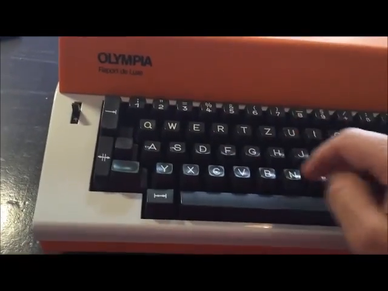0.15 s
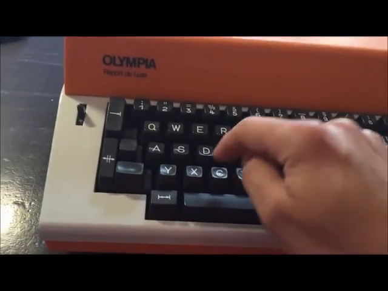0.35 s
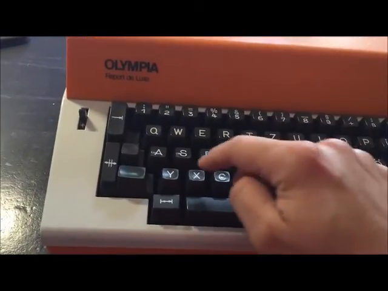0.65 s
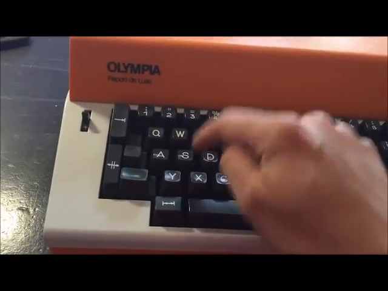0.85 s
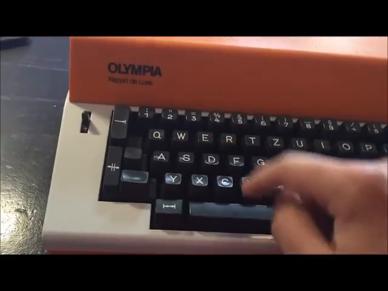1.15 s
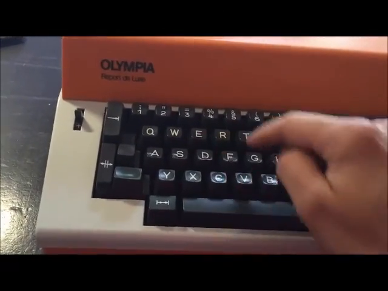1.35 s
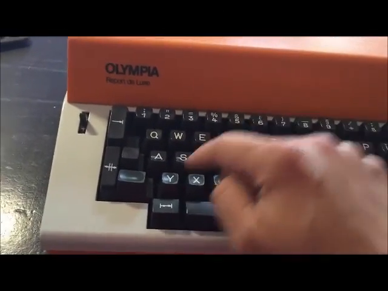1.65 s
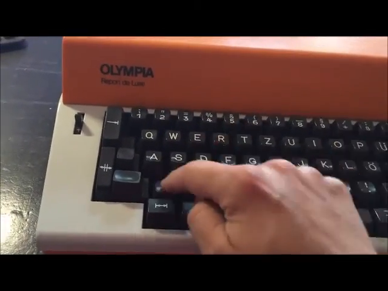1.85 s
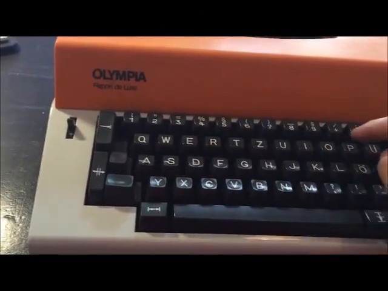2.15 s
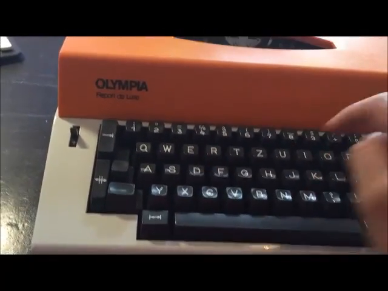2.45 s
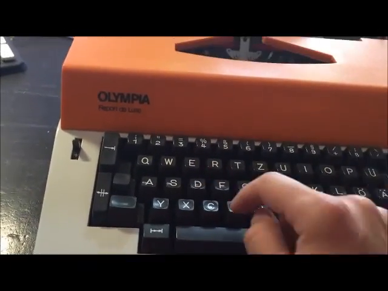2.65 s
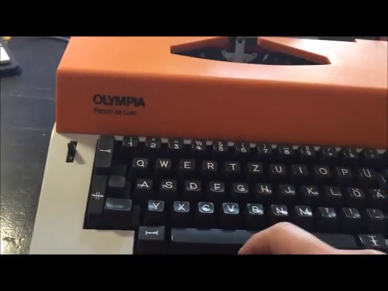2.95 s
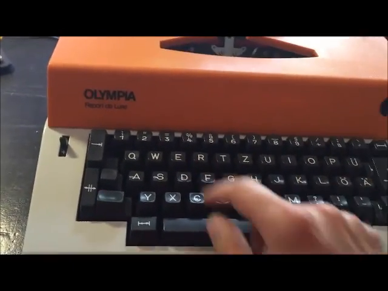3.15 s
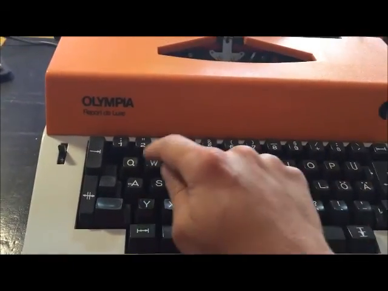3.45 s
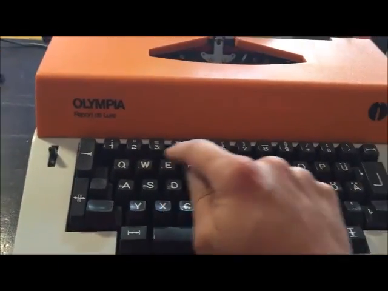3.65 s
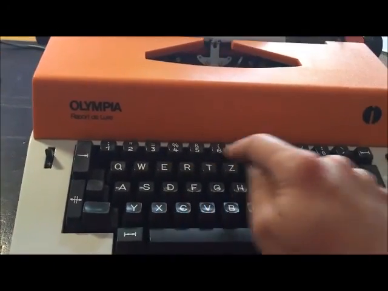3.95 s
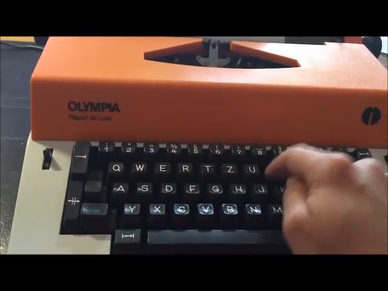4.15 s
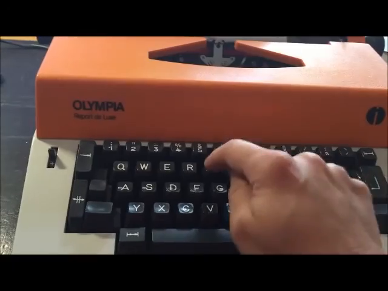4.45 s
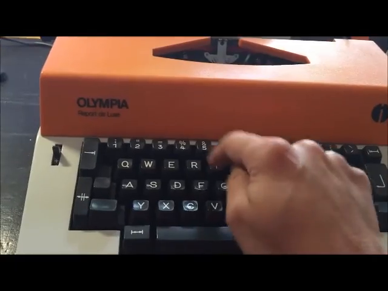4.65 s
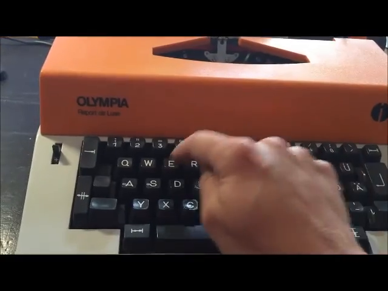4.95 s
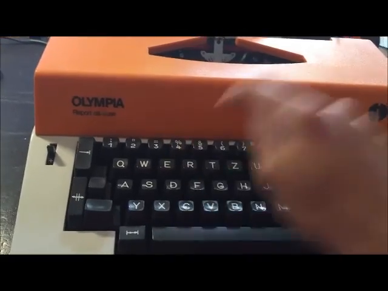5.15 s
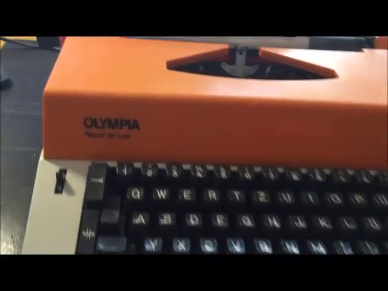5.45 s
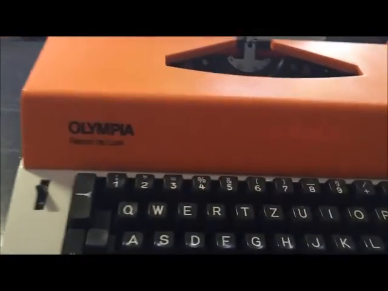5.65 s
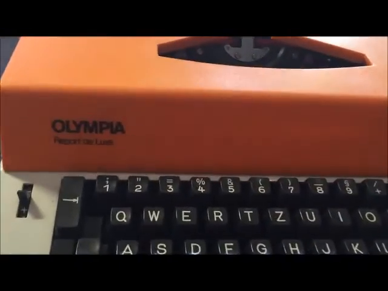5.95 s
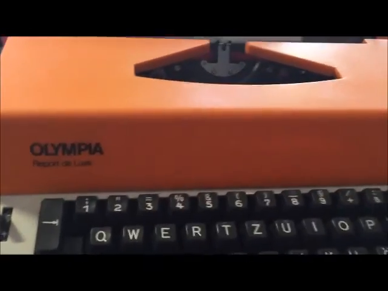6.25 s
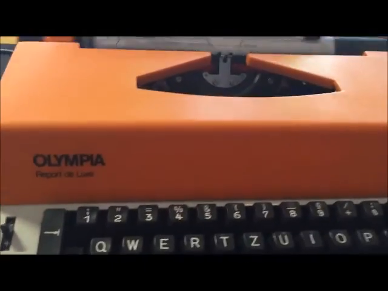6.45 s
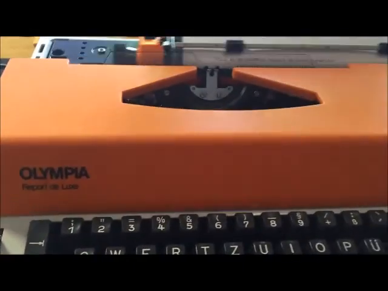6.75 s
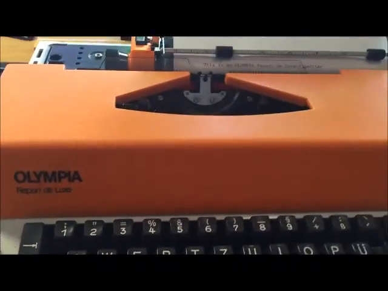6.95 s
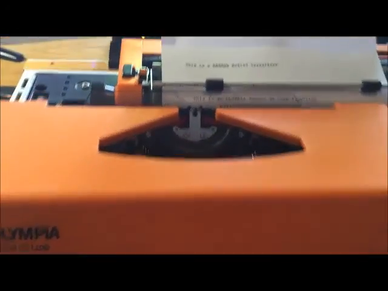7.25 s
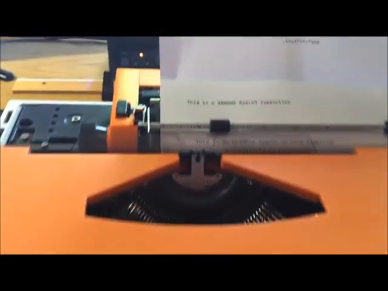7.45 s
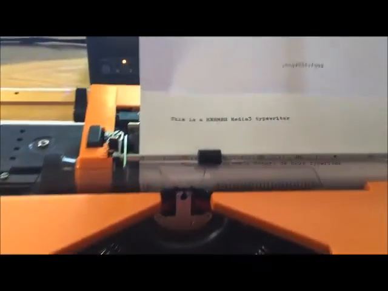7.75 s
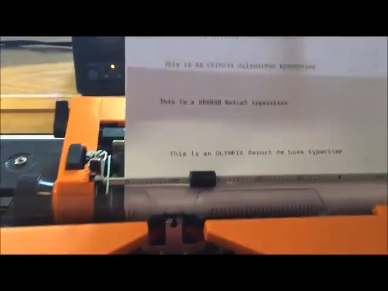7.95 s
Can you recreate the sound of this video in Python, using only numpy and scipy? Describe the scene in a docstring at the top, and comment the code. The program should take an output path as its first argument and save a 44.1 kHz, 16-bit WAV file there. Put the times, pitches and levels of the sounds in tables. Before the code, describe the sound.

Steady low motor whirr under crisp, loud typebar slaps, each preceded by a tiny latch click and followed by a clattering fall-back and faint singing spring. Twelve uneven letters and one softer space, then mostly hum and slight handling. A clunky carriage return follows, with line-feed clicks, gear whirr and hard end-stop bangs. Desk thumps lead to a grinding ratchet at the end. Close, dry sound with short small-room reflections.

```python
"""A small quiet room, a hand-held microphone close to an electric typewriter on a desk; its motor hums throughout.
First one finger types: latch, chattering linkage, typebar on the platen, fall-back, carriage step, a singing spring.
A space falls among the early letters. After the last one a hand scuffs the case and ticks loose levers.
Then the clutch runs the carriage back to its stop with a line feed; at the end the platen is wound over its ratchet.
Contacts are decaying noise bursts, ringing parts are decaying cosines, and the motor is filtered noise and tones."""
import sys
import numpy as np
from scipy import signal
from scipy.fft import rfft, irfft
from scipy.io import wavfile

SR = 44100
rng = np.random.default_rng(int(sys.argv[2]) if len(sys.argv) > 2 else 0)


def wrap_up_sound(samples):
    """Save the sound to the file named by the first command line argument, as 16-bit audio."""
    columns = np.atleast_2d(samples).T
    # keep every value between -1 and 1, then stretch to whole-number steps
    tamed = np.clip(columns, -1, 1)
    steps = np.round(tamed * 32767).astype(np.int16)
    wavfile.write(sys.argv[1], SR, steps)


N = 356945
TIME = np.arange(N) / SR

# Levels in the tables are relative: each source sets its own distance from the microphone.
# decay of the small room: pitch_hz, t60_s
ROOM_DECAY = [(100, 0.18), (500, 0.37), (1600, 0.5), (2500, 0.44), (6000, 0.41), (10000, 0.26),
              (15000, 0.22)]
# spectrum of motor, belt and power roll: pitch_hz, level_db (per Hz)
MOTOR_COLOUR = [(15, -54.5), (25, -18), (69, -12.5), (101, -3.5), (163, -10.5), (293, -11.5), (344, -16),
                (488, -11.5), (529, -20.5), (621, -17.5), (1120, -15.5), (1240, -17.5), (2560, -25),
                (3730, -30.5), (15000, -38.5)]
# steady tones of the motor: pitch_hz, level_db (rms)
MOTOR_HUM = [(96.9, -69.5), (253.0, -72.5), (285.3, -70), (312.2, -69.5), (419.9, -85), (672.9, -86),
             (899.0, -83), (1448, -82.5)]
# soft scuffs of a hand on the case: start_s, level_db, t60_s
HAND_SCUFFS = [(5.642, -51.5, 0.3), (5.982, -51.5, .53), (6.035, -48, 0.71), (7.244, -56.5, 0.63)]
# faint ticks of loose levers: start_s, level_db
LEVER_TICKS = [(6.075, -48.5), (6.136, -46.5), (6.242, -51), (7.328, -44.5)]
# light ping of a lever: start_s, pitch_hz, level_db, t60_s
LEVER_PING = [(5.587, 7450, -55, .12)]
# spectrum of a hand on the case: pitch_hz, level_db (per Hz)
HAND_COLOUR = [(80, 5), (500, -9.5), (1000, -1), (1600, -7), (2300, 0), (3200, -27), (12000, -35)]
# thumps that reach the case and the desk: start_s, level_db, t60_s
DESK_THUMPS = [(1.408, -34.5, 0.24), (2.672, -42, 0.12), (6.409, -38, 0.87), (6.81, -42, 0.3),
               (6.889, -35, 0.42), (7.25, -46, 0.45), (7.331, -37, .25), (7.827, -42, 1)]
# spectrum of the rocking desk: pitch_hz, level_db (per Hz)
DESK_COLOUR = [(30, -36.5), (50, -6.5), (72, 1.5), (95, -2.5), (125, -5), (180, -16.5), (300, -8),
               (600, -26.5), (2000, -64.5)]
# spectrum of a bump in the case: pitch_hz, level_db (per Hz)
CASE_COLOUR = [(80, -17), (190, -11.5), (280, 0), (400, 2), (700, -12), (2000, -22.5), (8000, -51.5)]
# blows of the carriage return, from key and clutch to end stop: start_s, level_db, t60_s, steel_share (0-1)
RETURN_BLOWS = [(6.3412, -21.5, 0.085, 0.66), (6.457, -20.5, 0.068, 0.1), (6.526, -21.5, 0.11, 0.6),
                (6.557, -14, 0.034, 0.13), (6.580, -21, 0.025, 0.1), (6.8155, -10, .036, .66),
                (6.8725, -13, 0.052, 0.1)]
# loudness of the carriage run: start_s, level_db
RUN_LEVEL = [(6.36, -56.5), (6.44, -9), (6.55, -3.5), (6.7, -2.5), (6.8, 0.5), (6.85, -65)]
# spectrum of the carriage rolling on its rail: pitch_hz, level_db (per Hz)
RUN_COLOUR = [(35, -52.5), (60, -14), (209, -20.5), (302, -10.5), (551, -18), (762, -5.5), (835, -17),
              (1490, -9), (1920, -12.5), (2360, -8), (3270, -25.5), (6380, -27.5), (15000, -45)]
# whine of the carriage gears: pitch_hz, level_db (rms)
GEAR_WHINE = [(303, -54), (774, -42.5), (1456, -45.5), (1548, -45)]
# spectrum of the carriage body: pitch_hz, level_db (per Hz)
CARRIAGE_COLOUR = [(60, -25), (300, -4), (600, -0.5), (1000, -0.5), (1600, 4.5), (2500, 4), (3300, -4.5),
                   (4200, -4), (6000, -1.5), (9000, -16), (15300, -11)]
# dull clunks of the carriage landing: start_s, level_db, t60_s
LANDINGS = [(1.403, -29.5, 0.15), (6.7997, -18, 0.058), (6.812, -18, 0.058), (7.330, -32.5, 0.09)]
# spectrum of a carriage landing: pitch_hz, level_db (per Hz)
LANDING_COLOUR = [(120, -21.5), (400, -5), (600, -1), (780, -10), (1000, 3.5), (1300, -3), (1800, -3),
                  (2400, -6), (3200, -16.5), (12000, -32)]
# platen ratchet teeth, at the line feed and while winding: start_s, level_db
RATCHET_TEETH = [(6.4038, -14), (6.424, -12), (7.821, -10), (7.831, -11.5), (7.846, -12.5), (7.875, -11.5),
                 (7.905, -11), (7.922, -14.5), (7.940, -17), (7.954, -19.5), (7.9722, -26), (7.991, -22),
                 (8.0119, -17), (8.029, -14), (8.051, -13), (8.071, -12)]
# spectrum of the pawl scraping over a tooth: pitch_hz, level_db (per Hz)
PAWL_COLOUR = [(100, -25), (270, -6), (480, -11), (900, -9.5), (1600, -14.5), (2200, 2), (2900, -0.5),
               (3500, -5), (4700, -23), (5700, -10), (7200, -15), (9000, -20), (12000, -21), (15300, -30)]
# ring of the pawl: pitch_hz, level_db, t60_s
PAWL_RING = [(2270, -7.5, 0.031), (2880, 0, 0.014), (3010, -8, 0.021), (5250, -22, .008)]
# typed letters: blow_s, blow_db, latch_db, back_s (fall-back, after the blow), back_db, desk_db, spring_db
LETTER_STROKES = [(-.036, -3, -14, .023, -12, -38.5, -50), (0.9045, -2, -20, 0.024, -18, -36.5, -47),
                  (1.0851, -2.5, -13.5, 0.025, -16.5, -41, -40), (1.6381, -2.5, -13, .022, -16, -47, -48.5),
                  (1.988, -3, -18.5, .02, -15.5, -42, -43), (2.4501, -1, -11, .019, -12.5, -37, -42),
                  (3.6427, -1.5, -13.5, .03, -18, -36.5, -47.5),
                  (3.9423, -2.5, -13.5, .0225, -17, -37.5, -45), (4.3092, -3, -13, .023, -14.5, -38.5, -39),
                  (4.728, -3.5, -13.5, .022, -16, -41.5, -48), (5.0248, -1, -14.5, .022, -17, -35.5, -49.5),
                  (5.1674, -4.5, -13.5, .025, -14, -36, -42.5)]
# key trip, cam lift, link pull and escapement of every letter: delay_s (from the blow), level_db, t60_s,
# steel_share (0-1)
STROKE_CONTACTS = [(-.056, -35.5, .03, 0.87), (-.0255, -19, 0.044, 0.8), (-.0135, -22.5, .03, 0.5),
                   (.0346, -20.5, 0.14, 0.5)]
# spectrum of bright steel levers: pitch_hz, level_db (per Hz)
STEEL_COLOUR = [(200, -30), (900, -24.5), (1800, -13.5), (2700, -2), (3700, -8), (4650, -20), (5400, -4.5),
                (7000, -2), (8000, -4), (9100, 0), (10400, -7), (12300, -4), (13500, -6.5), (15000, -12)]
# spectrum of the frame behind the levers: pitch_hz, level_db (per Hz)
FRAME_COLOUR = [(60, -17), (250, -6), (600, -5.5), (1050, 0), (1600, 0), (2250, 3.5), (3000, -2.5),
                (3600, -4), (4800, -8), (6200, -7.5), (8200, -12.5), (9500, -11), (10400, -15),
                (15000, -17.5)]
# steel parts that ring after any contact: pitch_hz, level_db, t60_s
STEEL_RING = [(2050, -9, .13), (3020, -6, .08), (5500, -10, .07), (7340, -9.5, .15), (7900, -7, .18),
              (9470, 6.5, .07), (11080, 5, .08), (12400, 0, 0.17), (15000, 2.5, .12)]
# one typebar on the platen: pitch_hz, level_db, t60_s
PLATEN_RING = [(1350, -16.5, 0.022), (2129, -1, .015), (2350, 0, .014), (2940, -10.5, 0.024),
               (4247, -18.5, 0.025), (5443, -6.5, .014), (6100, 1, 0.012), (6550, 1.5, 0.011),
               (7080, -8.5, 0.019), (11200, -11, .005), (12500, -13, 0.0055)]

LATCH_S = -.047  # the latch throws the cam onto the power roll, before the blow
SPACE_S, SPACE_DB = 1.3205, -23.5  # the space bar fires
REBOUND_S, REBOUND_LOSS_DB = .0187, 1.3  # its lever rebounds, weaker each time
STEP_S, STEP_DB = .082, -23  # then the carriage comes to rest one step on
FEED_S, FEED_PEAK_S, FEED_END_S = 6.372, 6.408, 6.555  # the line feed rattles up, is at its hardest, has settled
STOP_S, STOP_RATTLE_S = 6.812, .092  # the carriage shudders against the end stop
WINDING_S, PAPER_RISE_S = 7.821, .022  # the paper noise is full at WINDING_S, after this rise
TOOTH_T60_S, TOOTH_DB, DRAG_DB = 0.024, -6, 11  # a tooth DRAG_DB weaker than TOOTH_DB scrapes e times longer
SPRING_HZ, SPRING_T60_S, SPRING_SWELL_S = 420.4, 1.82, 0.056
OVERTONE_HZ, OVERTONE_DB, OVERTONE_T60_S = 3806, -17, .6  # a high wire mode of the same spring
TOP_HZ = 15300  # upper limit of the microphone chain


def undb(db):
    """Decibels to gain."""
    return 10 ** (np.asarray(db) / 20)


def fade(t, t60):
    """Exponential decay that loses 60 dB in t60 seconds."""
    return np.exp(-np.log(1000) * t / t60)


def add(track, start_s, sound):
    """Mix a sound into a track, cutting whatever falls outside."""
    start = int(round(start_s * SR))
    lo, hi = max(start, 0), min(start + len(sound), len(track))
    if hi > lo:
        track[lo:hi] += sound[lo - start:hi - start]


def through(x, response):
    """Pass a sound through an impulse response."""
    return signal.fftconvolve(x, response)[:N]


def colour(x, points, size=4096):
    """Minimum-phase filter with the given spectrum; white noise keeps its level."""
    hz, db = np.transpose(points)
    bins = np.maximum(np.fft.rfftfreq(size, 1 / SR), 1)
    spectrum = undb(np.interp(np.log(bins), np.log(hz), db))
    cepstrum = irfft(np.log(spectrum))
    # fold the cepstrum forward in time, so nothing sounds before its cause
    cepstrum[1:size // 2] *= 2
    cepstrum[size // 2 + 1:] = 0
    response = irfft(np.exp(rfft(cepstrum)))
    return through(x, response / np.linalg.norm(response))


def walk(rate):
    """Random drift with a spread near 1, through `rate` new values a second."""
    knots = rng.standard_normal(int(N / SR * rate) + 2)
    return np.interp(TIME * rate, np.arange(len(knots)), knots)


def burst(db, t60, snap=0., rise_s=.0005, rattle_db=3, rattle_rate=450):
    """One contact: parts meet over a moment, snap home (share of the energy) and rattle unevenly to rest."""
    lead = max(int(rise_s * SR), 1)
    rise = np.linspace(0, 1, lead) ** 2
    decay = fade(np.arange(int(t60 * SR) + 2) / SR, t60)
    envelope = np.concatenate([rise, decay])
    bounces = rng.standard_normal(1024)
    bounce_at = np.arange(len(envelope)) / SR * rattle_rate
    rattle = undb(rattle_db * np.interp(bounce_at, np.arange(len(bounces)), bounces))
    chatter = rng.standard_normal(len(envelope)) * envelope * rattle
    snap = np.clip(snap, 0, 1)
    chatter *= np.sqrt(1 - snap) / np.linalg.norm(chatter)
    chatter[lead] += np.sqrt(snap)
    return undb(db) * np.linalg.norm(envelope) * chatter


def ring(modes, length_s, detune=0.):
    """A struck part as a sum of decaying modes, each randomly detuned by a small fraction."""
    t = np.arange(int(length_s * SR)) / SR
    total = np.zeros(len(t))
    for hz, db, t60 in modes:
        tuned_hz = hz * (1 + detune * rng.standard_normal())
        total += undb(db) * fade(t, t60) * np.cos(2 * np.pi * tuned_hz * t)
    return total


def tones(lines, waver, rate):
    """Lines of a rotating drive, each wavering a little in speed."""
    total = np.zeros(N)
    for hz, db in lines:
        turns = np.cumsum(1 + waver * walk(rate)) / SR
        total += np.sqrt(2) * undb(db) * np.sin(2 * np.pi * hz * turns)
    return total


def contacts(rows, body, snap, rise_s=.0018):
    """Each contact sounds partly in small steel levers and partly in the heavier body behind them."""
    bright, dull = np.zeros(N), np.zeros(N)
    for s, db, t60, share in rows:
        share = np.clip(share, 0, 1)
        add(bright, s - rise_s, np.sqrt(share) * burst(db, t60, snap, rise_s))
        add(dull, s - rise_s, np.sqrt(1 - share) * burst(db, t60, snap, rise_s))
    return colour(bright, STEEL_COLOUR) + colour(dull, body)


def clatter(start_s, end_s, first_db, last_db, t60, share, count, scatter_db=2.0):
    """Loose parts tap at uneven moments, growing or dying away; `share` is the mean share of bright steel."""
    chance = rng.random((count, 3))
    along = (np.arange(count) + chance[:, 0]) / count
    times = start_s + (end_s - start_s) * along
    levels = first_db + (last_db - first_db) * along + scatter_db * (2 * chance[:, 1] - 1)
    shares = share * 2 * chance[:, 2]
    return [(s, db, t60, part) for s, db, part in zip(times, levels, shares)]


def reflections(x, build_s=0.002, count=24):
    """Diffuse reflections at one spot: noise in `count` bands that builds quickly, each band with its own decay."""
    t = TIME[:SR // 2]
    noise, bins = rfft(rng.standard_normal(len(t))), np.fft.rfftfreq(len(t), 1 / SR)
    edges = np.geomspace(40, SR / 2, count + 1)
    tail = np.zeros(len(t))
    for lo, hi in zip(edges, edges[1:]):
        t60 = np.interp(np.sqrt(lo * hi), *np.transpose(ROOM_DECAY))
        band = irfft(noise * ((bins >= lo) & (bins < hi)), len(t))
        tail += band * fade(t, t60)
    tail *= np.minimum(t / build_s, 1)
    return through(x, tail / np.linalg.norm(tail))


def room(x, wet_db=-11, count=6):
    """The hand-held microphone drifts from spot to spot, so the pattern of reflections keeps changing."""
    place = np.linspace(0, count - 1, N)
    echo = np.zeros(N)
    for spot in range(count):
        nearness = np.maximum(1 - np.abs(place - spot), 0)
        echo += np.sqrt(nearness) * reflections(x)
    return undb(wet_db) * echo


def motor(noise_db=-61):
    """The idling motor, belt and power roll: an uneven whirr of noise under steady, slightly wavering hum."""
    level = undb(noise_db + 1.2 * walk(31))
    whirr = level * colour(rng.standard_normal(N), MOTOR_COLOUR)
    return whirr + tones(MOTOR_HUM, waver=0.0044, rate=6.7)


def handling(tick_t60=0.13, tick_share=0.26, brush_s=0.03):
    """A hand brushes the case unevenly and nudges loose levers, one of which pings."""
    rub, ping = np.zeros(N), np.zeros(N)
    for s, db, t60 in HAND_SCUFFS:
        add(rub, s - brush_s / 2, burst(db, t60, rise_s=brush_s, rattle_rate=90))
    ticks = [(s, db, tick_t60, tick_share) for s, db in LEVER_TICKS]
    for s, *mode in LEVER_PING:
        add(ping, s, ring([mode], .2))
    return colour(rub, HAND_COLOUR) + contacts(ticks, CARRIAGE_COLOUR, snap=0.) + ping


def desk(swing_db=-2, swing_s=-.019, landing_s=.04, case_db=-34, case_s=.054, bump_db=-6):
    """Typebar swings and a leaning hand rock the desk; each carriage step lands with a dull bump in the case."""
    push, bump = np.zeros(N), np.zeros(N)
    for s, *_, db, _ in LETTER_STROKES:
        add(push, s + swing_s, burst(db + swing_db, 0.2, rise_s=0.0035))
        add(push, s + landing_s, burst(db, .36, rise_s=0.0073))
        add(bump, s + case_s, burst(case_db, .11, rise_s=0.0068))
    for s, db, t60 in DESK_THUMPS:
        add(push, s, burst(db, t60))
        add(bump, s, burst(db + bump_db, .12))
    for s, db, t60 in HAND_SCUFFS:
        add(push, s, burst(db, t60, rise_s=0.013))
    return colour(push, DESK_COLOUR) + colour(bump, CASE_COLOUR)


def carriage(rumble_db=-38.5, whine_db=-2):
    """The clutch pulls the carriage along its rail with rough, whining gears, until it hits the stop."""
    run = undb(np.interp(TIME, *np.transpose(RUN_LEVEL)))
    rolling = undb(rumble_db + 2 * walk(90)) * colour(rng.standard_normal(N), RUN_COLOUR)
    whine = tones(GEAR_WHINE, waver=.007, rate=100) * undb(whine_db + 3.5 * walk(90))
    landings = np.zeros(N)
    for s, db, t60 in LANDINGS:
        add(landings, s, burst(db, t60))
    rows = list(RETURN_BLOWS)
    rows += clatter(FEED_S, FEED_PEAK_S, first_db=-31, last_db=-25, t60=0.1, share=0.068, count=4)
    rows += clatter(FEED_PEAK_S, FEED_END_S, first_db=-22.5, last_db=-30, t60=0.086, share=.22, count=11)
    rows += clatter(STOP_S, STOP_S + STOP_RATTLE_S, first_db=-26.5, last_db=-32, t60=0.067, share=0.12, count=6)
    blows = contacts(rows, CARRIAGE_COLOUR, snap=0.03, rise_s=.0028)
    return run * (rolling + whine) + blows + colour(landings, LANDING_COLOUR)


def ratchet(paper_db=-41, climb_s=.003, catch_db=5, scrape_db=-4, pawl_db=-2, knock_db=-15):
    """The pawl climbs each tooth, rings as it drops and knocks the carriage; paper catches and slides round."""
    teeth, knocks, pawl = np.zeros(N), np.zeros(N), np.zeros(N)
    for s, db in RATCHET_TEETH:
        t60 = TOOTH_T60_S * np.exp((TOOTH_DB - db) / DRAG_DB)  # a gentle tooth drags for longer
        add(teeth, s - climb_s, burst(db + scrape_db, t60, snap=0.092, rise_s=climb_s))
        add(knocks, s - climb_s, burst(db + knock_db, 0.028, rise_s=climb_s))
        add(pawl, s, undb(db + pawl_db) * ring(PAWL_RING, .02, detune=.045))
    turning = np.clip((TIME - WINDING_S) / PAPER_RISE_S + 1, 0, 1)
    paper = turning * undb(paper_db + catch_db * walk(150)) * rng.standard_normal(N)
    scrapes = colour(teeth, PAWL_COLOUR) + pawl
    return scrapes + colour(paper, CARRIAGE_COLOUR) + colour(knocks, LANDING_COLOUR)


def spring():
    """Every letter plucks a spring afresh; it swells and sings until the next letter catches it."""
    out = np.zeros(N)
    ends = [row[0] for row in LETTER_STROKES[1:]] + [N / SR]
    for (s, *_, db), end in zip(LETTER_STROKES, ends):
        modes = [(SPRING_HZ, db, SPRING_T60_S), (OVERTONE_HZ, db + OVERTONE_DB, OVERTONE_T60_S)]
        tone = ring(modes, end - s)
        t = np.arange(len(tone)) / SR
        swell = 1 - np.exp(-t / SPRING_SWELL_S)
        caught = np.minimum(t[::-1] / .01, 1)
        add(out, s, tone * swell * caught)
    return out


def space_bar(t60=0.022, share=.62, key_db=-40, key_s=-0.008, lever_db=-41):
    """The space bar trips, its ringing lever rebounds, and the carriage rattles one step on."""
    rows = [(SPACE_S + k * REBOUND_S, SPACE_DB - k * REBOUND_LOSS_DB, t60, share) for k in range(3)]
    rows.append((SPACE_S + key_s, key_db, t60, share))
    rows.append((SPACE_S + STEP_S, STEP_DB, .065, .04))
    rows += clatter(SPACE_S + REBOUND_S, SPACE_S + STEP_S, first_db=-38, last_db=-34.5, t60=.1, share=.15, count=8)
    taps = contacts(rows, FRAME_COLOUR, snap=.03, rise_s=0.0032)
    lever = through(taps, ring([(9650, 0, .025)], .05))
    return taps + undb(lever_db) * lever


def linkage(scatter_db=1.4, scatter_s=.0007, guide_db=-8.0):
    """The motor drives one stroke per letter, never quite alike; levers chatter on the way up and back."""
    rows = []
    for s, blow_db, latch_db, back_s, back_db, *_ in LETTER_STROKES:
        for delay, db, t60, share in STROKE_CONTACTS:
            contact_s = s + delay + scatter_s * rng.standard_normal()
            rows.append((contact_s, db + scatter_db * rng.standard_normal(), t60, share))
        rows.append((s + LATCH_S, latch_db, .025, .95))
        rows.append((s + .001, blow_db + guide_db, .016, .5))  # the typebar rattles in its guide
        rows.append((s + back_s, back_db, .03, .3))  # it drops back on its rest
        rows += clatter(s - .044, s + .022, first_db=-29, last_db=-24.0, t60=0.052, share=.3, count=9)
        rows += clatter(s + .022, s + .053, first_db=-22.5, last_db=-29, t60=.08, share=.05, count=3)
    return contacts(rows, FRAME_COLOUR, snap=0.02, rise_s=.0024)


def typebars(blow_gain_db=-3, cam_db=-19, cam_s=-.0165, link_db=-20, link_s=-0.012):
    """A hollow knock as the cam swings over, a clink of the link, then type slaps the paper on the platen."""
    out = np.zeros(N)
    cam_modes = [(2280, 0, 0.021), (2330, -0.78, 0.033)]  # pitch_hz, level_db, t60_s
    link_modes = [(5590, 0.55, 0.022), (6700, -1.7, 0.028)]
    for s, blow_db, *_ in LETTER_STROKES:
        add(out, s + cam_s, undb(cam_db) * ring(cam_modes, .05, detune=0.031))
        add(out, s + link_s, undb(link_db) * ring(link_modes, 0.032, detune=0.025))
        for mode in PLATEN_RING:
            # the bar, its guide and the platen start to ring a moment apart
            part = undb(blow_db + blow_gain_db) * ring([mode], 0.037, detune=0.0054)
            add(out, s + .0004 * rng.random(), part)
    return out


def scene(steel_db=-62, ratchet_wet=0.55, platen_wet=0.54):
    """Contacts set steel ringing; the room answers, less so for the platen, which faces the microphone."""
    hits = linkage() + space_bar() + carriage() + handling()
    steel = undb(steel_db) * through(hits, ring(STEEL_RING, .3))
    machine = hits + steel + desk()
    blows, winding = typebars(), ratchet()
    echo = room(machine + platen_wet * blows + ratchet_wet * winding)
    return (machine + blows + winding + echo + spring() + motor())[None]


def record(dry, low_hz=38):
    """The microphone loses the deepest bass, overloads on the hardest blows, and has no treble above TOP_HZ."""
    thin = signal.sosfilt(signal.butter(2, low_hz, "highpass", fs=SR, output="sos"), dry)
    rounded = thin / (1 + np.abs(thin) ** 6) ** (1 / 6)
    return signal.sosfilt(signal.ellip(10, .2, 80, TOP_HZ, fs=SR, output="sos"), rounded)


dry = scene()
out = record(dry)
wrap_up_sound(out)
```